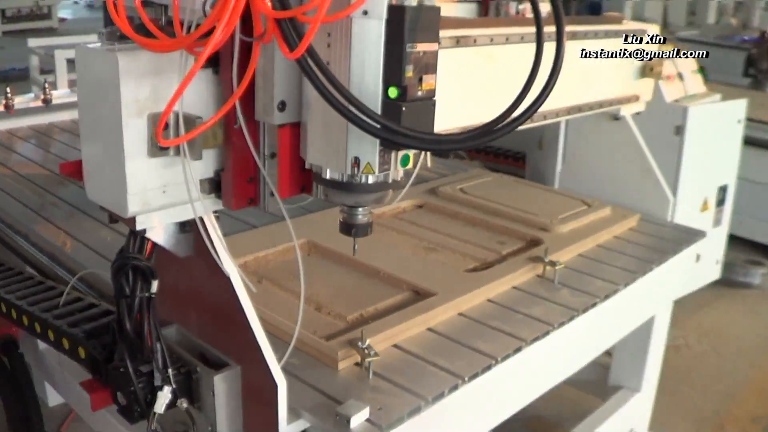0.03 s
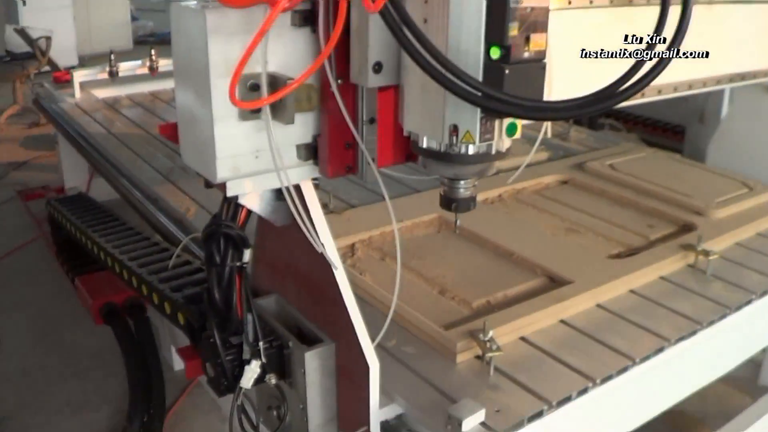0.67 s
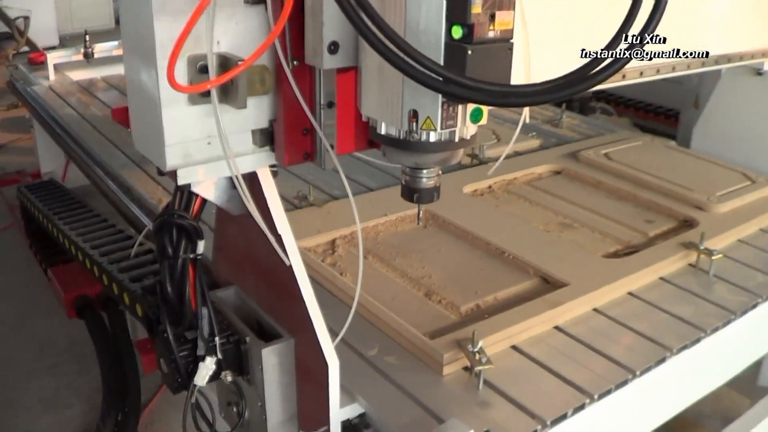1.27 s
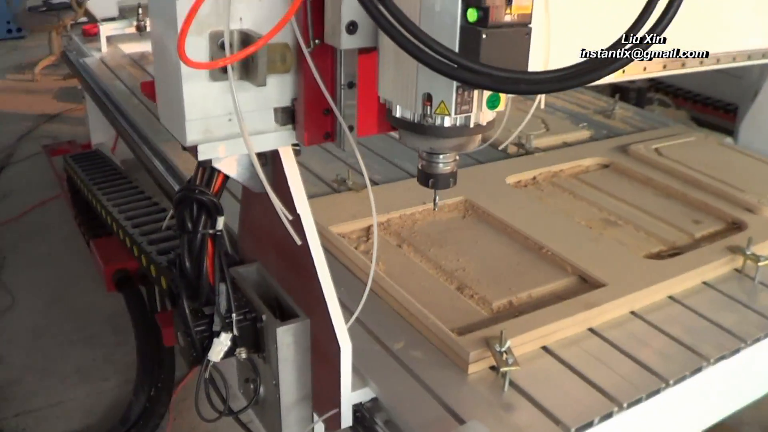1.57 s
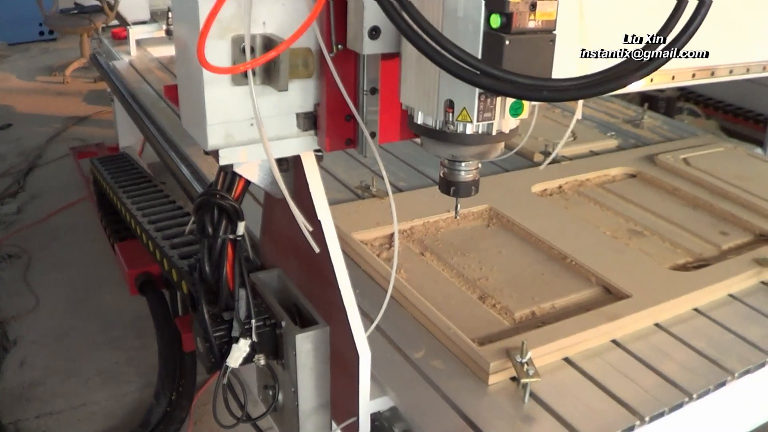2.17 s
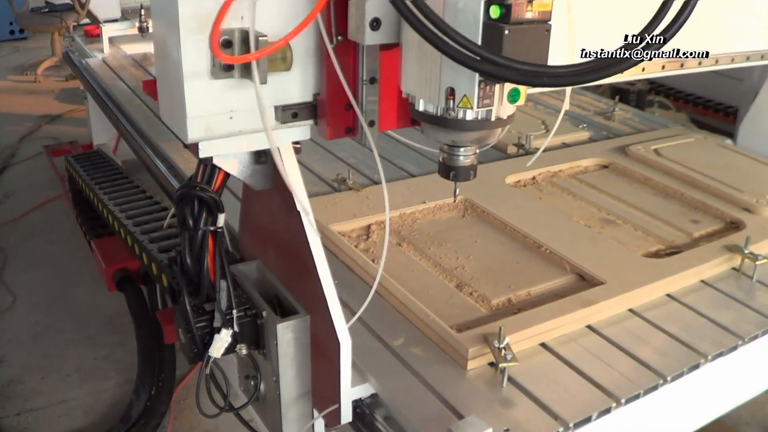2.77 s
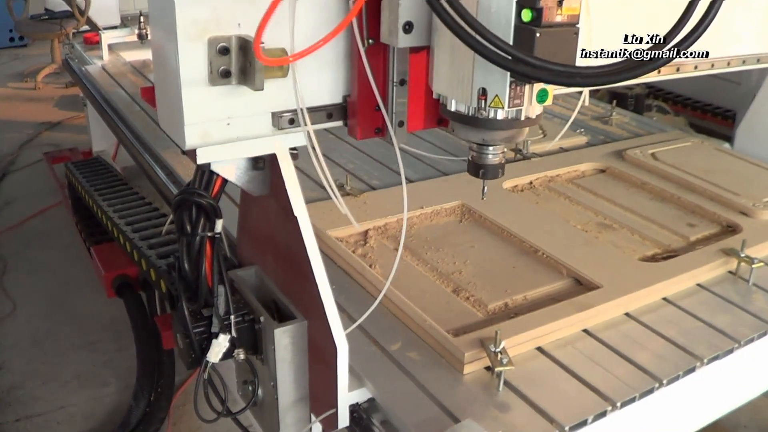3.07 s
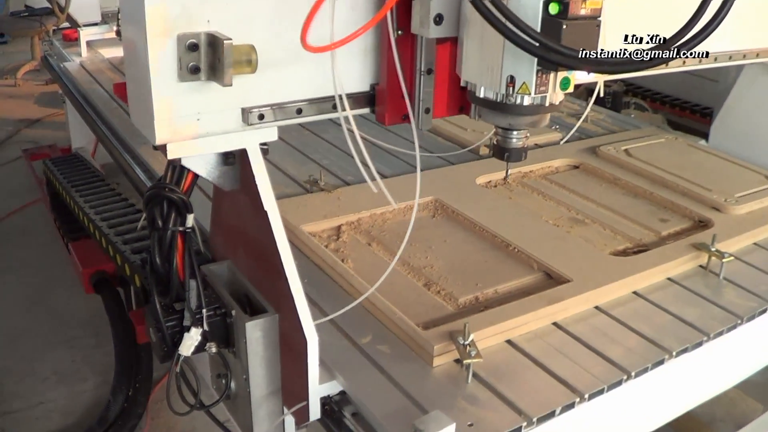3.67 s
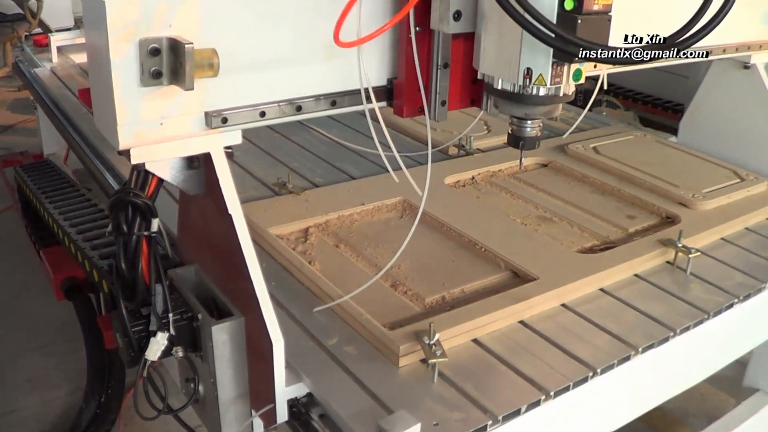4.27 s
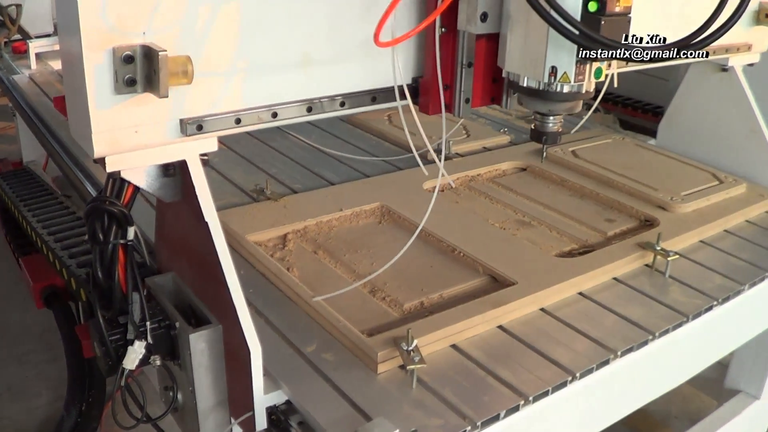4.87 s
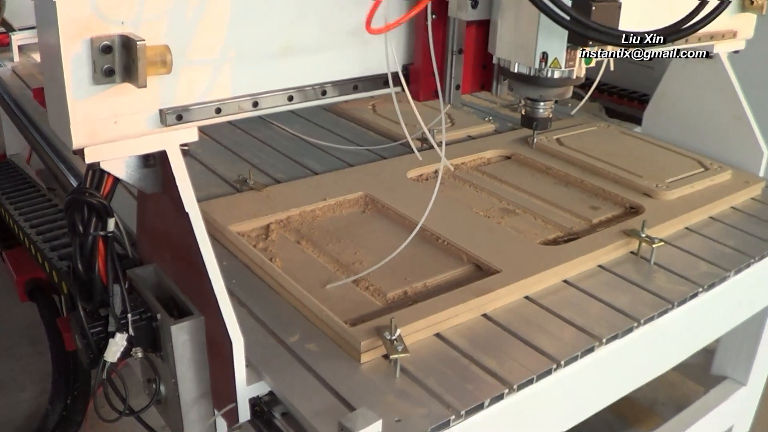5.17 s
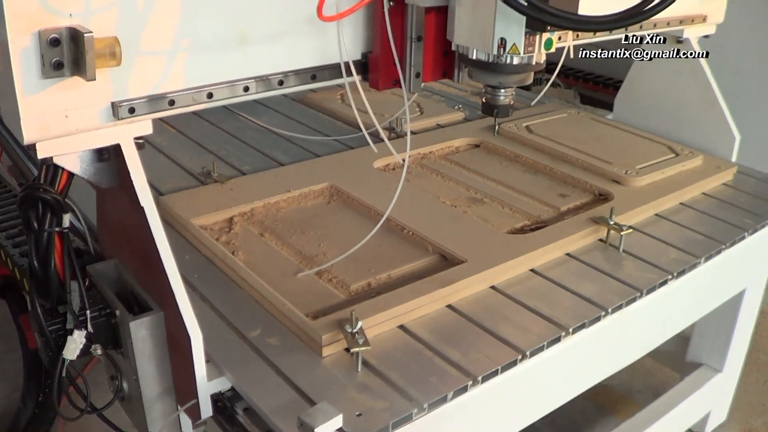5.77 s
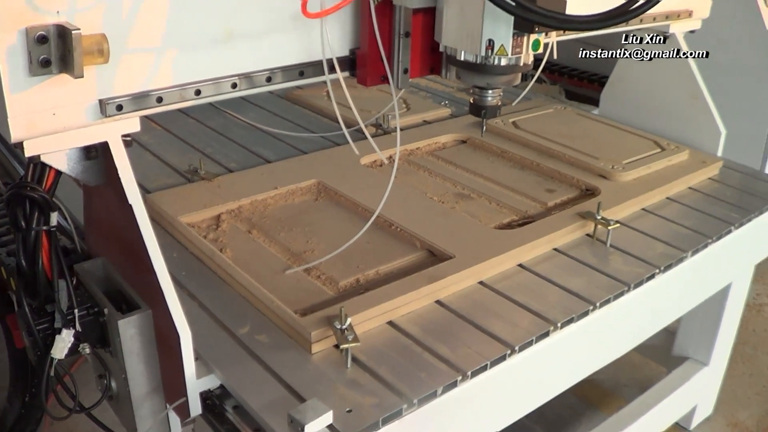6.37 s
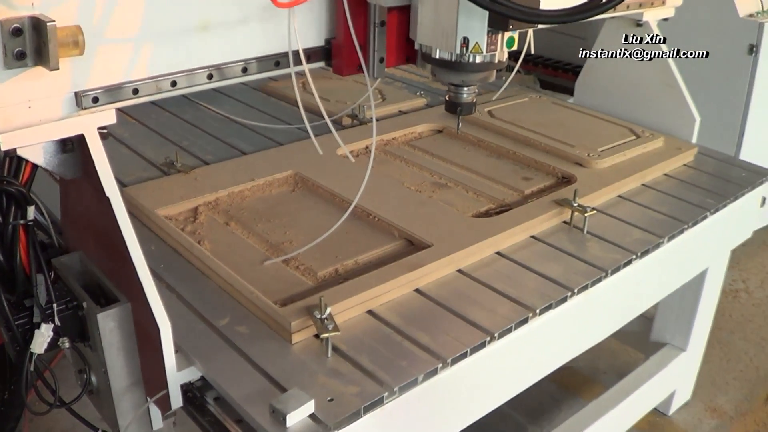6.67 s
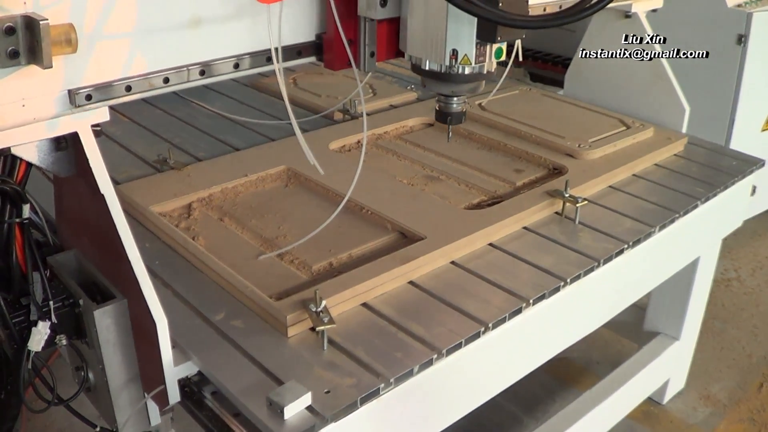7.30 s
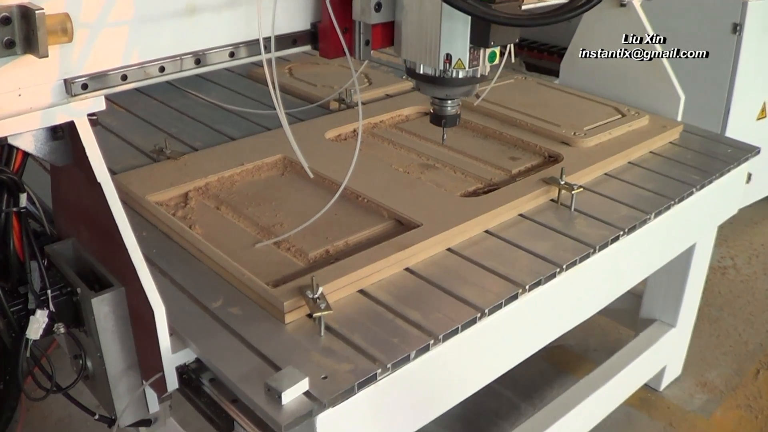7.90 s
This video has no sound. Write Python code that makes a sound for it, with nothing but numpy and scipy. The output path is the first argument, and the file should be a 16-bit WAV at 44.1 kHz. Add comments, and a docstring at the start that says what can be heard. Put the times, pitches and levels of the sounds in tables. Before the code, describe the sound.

Steady air hiss and a faint spindle whir come from an idling cutting machine, with a low workshop rumble underneath. The tone of the hiss shifts as the microphone is carried around it, and a few soft bumps pass. Towards the end the gantry moves: a motor hum rises in pitch and settles, joined by gear whine, rolling noise and brief ringing tones from the frame.

```python
"""A CNC router (a computer-driven cutter) idles: from the start, air hisses at its whirring spindle
over a low room rumble. A hand-held microphone is carried round the table, so echoes off nearby panels
keep changing the colour of the hiss. Just before 2 s come a few soft bumps. From about 6.3 s a drive
motor hums along the gantry (the bridge that carries the spindle) and sets the steel frame singing."""
import sys
import numpy as np
from scipy import signal
from scipy.fft import rfft, irfft
from scipy.io import wavfile
from scipy.ndimage import uniform_filter1d

SR = 44100
rng = np.random.default_rng(int(sys.argv[2]) if len(sys.argv) > 2 else 0)


def dump(signal):
    """Clip the signal to [-1, 1] and save it as 16-bit WAV at the path in sys.argv[1]."""
    limited = np.clip(np.atleast_2d(signal).T, -1, 1)
    pcm = np.round(limited * 32767).astype(np.int16)
    wavfile.write(sys.argv[1], SR, pcm)


N = 350154
TIME = np.arange(N) / SR
# noise is shaped in short overlapping slices, on a grid of frequencies (HZ) and times (SLICE_TIME)
SLICE, HOP = 2048, 512  # samples
HZ = np.fft.rfftfreq(SLICE, 1 / SR)[:, None]
SLICE_TIME = np.arange(-(-N // HOP) + 1) * HOP / SR

# how far the microphone has been carried: (time [s], distance [m])
WALK = [(0, 0), (1.6, 0.64), (2.8, 0.67), (4.7, 1.44), (6.3, 1.51), (7.94, 1.98)]


def gain_of(db):
    """Turn decibels into a factor to multiply a sound by."""
    return 10 ** (np.asarray(db) / 20)


def spectrum(points):
    """Join (frequency, value) points into a curve over HZ, on a log frequency scale."""
    hz, value = np.transpose(points)
    return np.interp(np.log(HZ + 1), np.log(hz), value)


def follow(rows, at):
    """Look up `at` in a table's first column and blend the nearest rows of the other columns."""
    positions, *columns = np.transpose(rows)
    return [np.interp(at, positions, column) for column in columns]


def lifts(resonances):
    """The dB that resonances add at each frequency."""
    return sum(db / (1 + (2 * (HZ - hz) / width) ** 2) for hz, width, db in resonances)


def arch(t, middle, length):
    """A smooth swell from 0 to 1 and back."""
    return np.cos(np.pi * np.clip((t - middle) / length, -.5, .5))


def onset_db(t, start_s, rise_s):
    """A fade-in, in dB, from near silence to full level."""
    return 20 * np.log10(np.clip((t - start_s) / rise_s, 1e-4, 1))


def effort_db(t, rise_s, start_s=6.3, full_db=-2):
    """How hard the drive works: it takes up its load, then holds it."""
    return full_db + onset_db(t, start_s, rise_s)


def wander(per_s):
    """A smooth random curve of typical size 1 that moves about per_s times a second."""
    keep_slow = np.exp(-(np.fft.rfftfreq(N, 1 / SR) / per_s) ** 2)
    slow = irfft(rfft(rng.standard_normal(N)) * keep_slow, N)
    return slow / slow.std()


def patches(bands, slices):
    """Random blotches of typical size 1, smoothed over so many frequency bands and time slices."""
    field = rng.standard_normal((len(HZ), len(SLICE_TIME)))
    for axis in (0, 1, 0, 1):
        field = uniform_filter1d(field, (bands, slices)[axis], axis)
    return field / field.std()


def white():
    """White noise at 0 dB per Hz, split into slices and frequencies."""
    samples = rng.standard_normal(N) * np.sqrt(SR / 2)
    return signal.stft(samples, nperseg=SLICE, noverlap=SLICE - HOP)[2]


def noise(db, pan_db):
    """Noise shaped by db, as the microphone's two close openings hear it; positive pan_db leans left."""
    # how alike the two sides are: (frequency [Hz], likeness [0-1])
    likeness = [(50, 0.84), (200, 0.89), (520, 0.79), (760, 0.93), (1200, 0.76), (1800, 0.9), (2300, 0.81),
                (3400, 0.89), (5500, 0.87), (10500, .88)]
    # how much louder the left side is: (frequency [Hz], left minus right [dB])
    balance = [(60, 2), (190, 3), (400, 1.5), (530, 0.5), (700, 2), (1100, -1), (1700, 0), (2200, -1.3),
               (4000, -2.5), (5500, -1), (6500, 1), (8200, 2.5), (10500, 0.8)]
    # how far the left wave runs ahead: (frequency [Hz], lead [radians])
    left_lead = [(50, 0), (400, .05), (550, .33), (950, 0.048), (2100, 0.075), (3200, 0.05), (4500, 0.33),
                 (6200, 0.29), (7700, .26), (9300, -.1), (10500, 0)]
    same = np.clip(spectrum(likeness), 0, 1)
    left = white()
    right = same * left + np.sqrt(1 - same ** 2) * white()
    right *= np.exp(-1j * spectrum(left_lead))
    lean = gain_of((spectrum(balance) + pan_db) / 2)
    shaped = np.array([left * lean, right / lean]) * gain_of(db)
    return signal.istft(shaped, nperseg=SLICE, noverlap=SLICE - HOP)[1][:, :N]


def tone(hz, db, pan_db, lead):
    """A pure stereo tone whose pitch and level may move; the left side is `lead` radians ahead."""
    angle = 2 * np.pi * (np.cumsum(hz * np.ones(N)) / SR + rng.random())
    lean = gain_of(pan_db / 2)
    return np.sqrt(2) * gain_of(db) * np.array([np.sin(angle + lead) * lean, np.sin(angle) / lean])


def room_and_fan(swell_db=.5, lumpy_db=1.76):
    """The workshop rumbles, swelling slowly, under the whirr of the spindle's cooling air."""
    # rumble and fan noise: (frequency [Hz], level [dB per Hz])
    wash = [(15, -83), (45, -77), (70, -70), (110, -64.5), (165, -66), (235, -63.5), (310, -67),
            (420, -66.5), (600, -67), (800, -69), (1000, -71.5), (1500, -74), (3000, -92)]
    # resonances of the cooling air: (frequency [Hz], width [Hz], lift [dB])
    fan_peaks = [(484, 23, 7), (732, 77, 7.5), (809, 38, 8.5)]
    # slow level changes: (time [s], rumble [dB], upper band above about 500 Hz [dB]); the upper band rises
    # while the drive runs
    trend = [(0, 2, 1.5), (.9, 0, -0.3), (2.2, 0.1, 0.7), (6.4, -0.5, 0.5), (7.94, -3.5, 4.5)]
    rumble_db, upper_db = follow(trend, SLICE_TIME)
    rumble_db += swell_db * np.interp(SLICE_TIME, TIME, wander(1.6))
    bass_share = 1 / (1 + (HZ / 500) ** 4)  # rumble below about 500 Hz, air above
    level_db = bass_share * rumble_db + (1 - bass_share) * upper_db
    lumps_db = lumpy_db * patches(bands=5, slices=14)
    return noise(spectrum(wash) + lifts(fan_peaks) + level_db + lumps_db, pan_db=-1.5)


def soft_bumps():
    """Low bumps in the workshop, each a very short swell of one tone."""
    # the bumps: (middle [s], pitch [Hz], peak level [dB], length [s])
    bumps = [(1.536, 220, -36, 0.036), (1.832, 165, -34, 0.042), (1.85, 245, -34, 0.034),
             (1.97, 200, -38, .025)]
    return sum(arch(TIME, middle, length) * tone(hz, db, pan_db=4.5, lead=.1)
               for middle, hz, db, length in bumps)


def spindle_tones(waver=.00304, fading_db=2.3):
    """The idling spindle gives faint tones that waver in pitch and level."""
    # the idle tones: (pitch [Hz], level [dB])
    tones = [(825, -47.5), (166, -56.5), (116, -59.5)]
    return sum(tone(hz * (1 + waver * wander(8)), db + fading_db * wander(7.6), pan_db=.5, lead=.1)
               for hz, db in tones)


def gantry(waver=.005):
    """Rolling guides shake the steel frame, whose ringing notes swell one after another."""
    # rolling noise of the toothed rack and guides: (frequency [Hz], level [dB per Hz])
    rolling_shape = [(60, -83), (150, -62), (320, -63.5), (520, -73.5), (650, -60.5), (900, -61.5),
                     (1100, -67), (1600, -84), (2500, -79), (5000, -88)]
    # resonances of the frame: (frequency [Hz], width [Hz], lift or cut [dB])
    frame_peaks = [(706, 39, 8.5), (764, 17, 1), (790, 20, -5), (847, 27, 9.5), (972, 22, 11)]
    # frame notes that the drive sets off: (middle [s], pitch [Hz], peak level [dB], length [s])
    notes = [(6.45, 706, -28, .1), (6.56, 835, -35, .1), (6.67, 762, -29.5, .11), (6.796, 772, -29.5, 0.1),
             (6.89, 681, -28.5, 0.23), (7.003, 974, -31.5, .075), (7.097, 844, -33, .084),
             (7.286, 754, -32, 0.081), (7.537, 968, -33, 0.078), (7.649, 993, -32, 0.073),
             (7.686, 610, -35.5, .26)]
    load_db = effort_db(SLICE_TIME, rise_s=.15)
    rolling = noise(spectrum(rolling_shape) + lifts(frame_peaks) + load_db, pan_db=2.5)
    unsteady = 1 + waver * wander(30.7)
    singing = sum(arch(TIME, middle, length) * tone(hz * unsteady, db, pan_db=1, lead=.3)
                  for middle, hz, db, length in notes)
    return rolling + singing


def motor_hum(step_hz, start_s=6.43, growth_db_per_s=3, tremor_db=1.7, waver=.005):
    """The motor turns in tiny steps and hums at their rate, growing louder between brief dips."""
    # dips in the hum: (middle [s], length [s], change [dB])
    dips = [(6.653, 0.091, -6), (6.916, 0.22, -12.5), (7.112, 0.14, -6), (7.392, .07, -15),
            (7.572, 0.066, -15)]
    level_db = -34 + onset_db(TIME, start_s, rise_s=.076) + growth_db_per_s * (TIME - start_s)
    level_db += sum(db * arch(TIME, middle, length) for middle, length, db in dips)
    hz = step_hz * (1 + waver * wander(13))
    return tone(hz, level_db + tremor_db * wander(30), pan_db=6, lead=.45)


def gear_whine(step_hz, waver=.00596, rattle_db=3):
    """Motor and gear add unsteady overtones that build slowly; the frame passes them to the air."""
    # the overtones: (pitch [multiple of the step rate], base level [dB])
    overtones = [(1.56, -50), (3.01, -46), (3.53, -46), (3.79, -44.5), (4.019, -40), (4.891, -38.5),
                 (5.04, -39.5), (6.02, -51)]
    # how well the frame gives off sound: (frequency [Hz], lift or cut [dB])
    radiation = [(250, -4), (620, 3), (900, -7.5), (975, 2), (1020, -3), (1070, -4), (1200, -2),
                 (1350, -11)]
    load_db = effort_db(TIME, rise_s=.75)
    whine = 0
    for multiple, db in overtones:
        frame_db, = follow(radiation, multiple * step_hz)
        hz = multiple * step_hz * (1 + waver * wander(23.5))
        level_db = db + frame_db + load_db + rattle_db * wander(12)
        whine += tone(hz, level_db, pan_db=-1, lead=.2)
    return whine


def drive():
    """The drive speeds up, overshoots and settles; hum and whine follow its speed."""
    # motor speed: (time [s], step rate [Hz])
    speed = [(6.35, 150.5), (6.53, 190.2), (6.73, 222.2), (6.95, 223), (7.08, 208), (7.27, 197.3),
             (7.55, 201.9), (7.94, 198.8)]
    step_hz, = follow(speed, TIME)
    return motor_hum(step_hz) + gear_whine(step_hz)


def delay(ms):
    """What arriving ms milliseconds late does to the wave at each frequency."""
    return np.exp(-2j * np.pi * HZ * ms / 1000)


def far_echoes(strength=.23, max_ms_per_m=.302, count=24):
    """Weak echoes off farther parts of the machine; their delays slide with the distance walked."""
    walked_m, = follow(WALK, SLICE_TIME)
    echoes = 0
    for place, heading, flip in rng.random((count, 3)):
        delay_ms = 2.2 * 4 ** place + max_ms_per_m * (2 * heading - 1) * walked_m
        echoes += np.sign(flip - .5) * delay(delay_ms)
    return strength * echoes / np.sqrt(count)


def near_echoes():
    """Each nearby panel mirrors the hiss best at one spot of the walk; its echo swells and fades there."""
    # the panels: (best spot [m], reach [m], share of the direct sound [0-1],
    # delay at that spot [ms], change of delay [ms per m])
    panels = [(.57, 1.3, 0.084, 1.06, 0.031), (.77, .51, .059, 0.84, -.264), (1.01, 0.56, 0.1, 1.18, 0.088),
              (1.17, 0.26, 0.071, 1.423, 0.015), (1.29, .24, 0.098, 0.61, 0.028),
              (1.53, 1.3, .077, 0.732, -0.082), (1.59, 1.3, 0.053, 0.567, 0.025),
              (1.62, .52, 0.15, 0.913, -0.37), (2.1, 0.41, 0.27, 0.17, 0.044)]
    walked_m, = follow(WALK, SLICE_TIME)
    echoes = 0
    for spot_m, reach_m, share, delay_ms, ms_per_m in panels:
        past_m = walked_m - spot_m
        nearness = np.exp(-(past_m / reach_m) ** 2)
        echoes += share * nearness * delay(delay_ms + ms_per_m * past_m)
    return echoes


def air_jet(base_db=-58, ripple_db=1.73, flutter_db=.36):
    """Swirling air hisses, coloured by the spindle housing and by echoes that shift along the walk."""
    # the bare hiss: (frequency [Hz], level relative to base_db [dB])
    hiss = [(400, -20), (900, -14), (1300.0, -12), (2200.0, -7.5), (2700.0, -6), (3200.0, -3), (3900.0, 1),
            (4500.0, -2.25), (5200.0, -0.76), (6200.0, -0.9), (7200.0, -1.5), (8100.0, 1), (8550.0, -5),
            (9000.0, -1), (9700.0, -3), (10400.0, -4.5)]
    # resonances of the housing: (frequency [Hz], width [Hz], lift [dB])
    housing = [(1660, 53, 5.5), (3150, 160.0, 1.9), (3430, 270, 1.55), (4100, 150.0, 0.5), (5180, 200, 1.9),
               (5580, 180, 3), (7180, 460, 1), (8620, 280, 0.5), (8970, 200, 2.5)]
    # a slight lift high in the treble: (frequency [Hz], width [Hz], lift [dB])
    treble_lift = [(8640, 200, 1)]
    # bands that swell or fade as the microphone passes:
    # (middle [s], length [s], frequency [Hz], width [Hz], change [dB])
    passing_bands = [(.15, 1.0, 4060, 200, 4.5), (.85, 1.8, 8950, 400, 3), (2.06, 3.4, 2675, 250, 5.5),
                     (2.1, 1.8, 5950, 260, 3), (2.1, 1.1, 8050, 450, -5.5), (3.8, 3.6, 1760, 140, 2),
                     (4.03, 0.56, 3820, 240, 4), (5.25, 1, 5620, 200, 3), (5.57, 2.3, 7700, 180, 0.5),
                     (5.7, 0.92, 3170, 240, 3), (5.8, 2.9, 4350, 220, 2), (6.95, 2.2, 7090, 300, 1),
                     (7.62, 1.1, 4830, 600, -5.5), (7.55, 1.3, 5000, 276, 10)]
    # effect of where the microphone points: (time [s], brightness [dB per octave], lean to left [dB])
    aim = [(0, .5, .7), (2.3, 1.3, 0), (3.8, -0.2, -0.1), (5.1, 1, -0.8), (6.7, -.5, 0), (7.94, 0, 0)]
    brightness, pan_db = follow(aim, SLICE_TIME)
    tilt_db = brightness * np.log2(np.maximum(HZ, 1000) / 5000)
    # echoes add to the direct sound at some frequencies and weaken it at others, like teeth of a comb
    comb_db = 20 * np.log10(abs(1 + near_echoes() + far_echoes()))
    steady_db = base_db + spectrum(hiss) + lifts(housing) + lifts(treble_lift)
    passing_db = sum(arch(SLICE_TIME, middle, length) * lifts([band])
                     for middle, length, *band in passing_bands)
    random_db = ripple_db * patches(bands=2, slices=24)  # the room adds a fine, slowly drifting ripple
    random_db += flutter_db * patches(bands=200, slices=6)  # the jet itself flutters
    return noise(steady_db + passing_db + comb_db + tilt_db + random_db, pan_db)


def scene():
    """The hissing, idling machine and the move of its gantry."""
    return air_jet() + room_and_fan() + spindle_tones() + soft_bumps() + drive() + gantry()


def record(dry):
    """Cut the treble steeply above about 10.5 kHz."""
    low_pass = signal.firwin(1023, 10510, window=("kaiser", 9), fs=SR)
    return signal.oaconvolve(dry, low_pass[None], "same")


dry = scene()
out = record(dry)
dump(out)
```